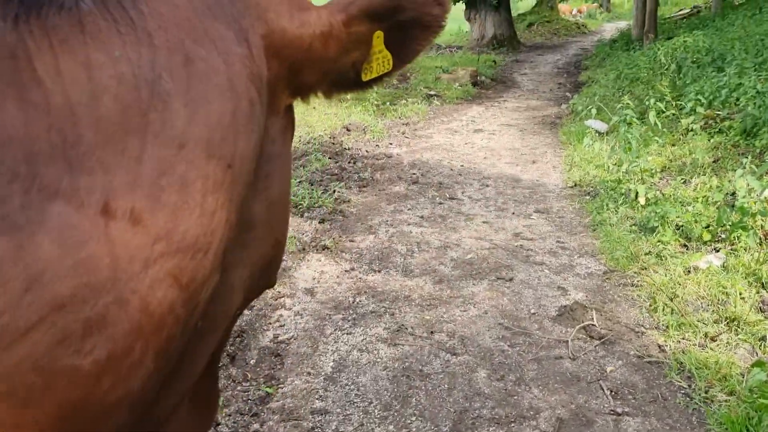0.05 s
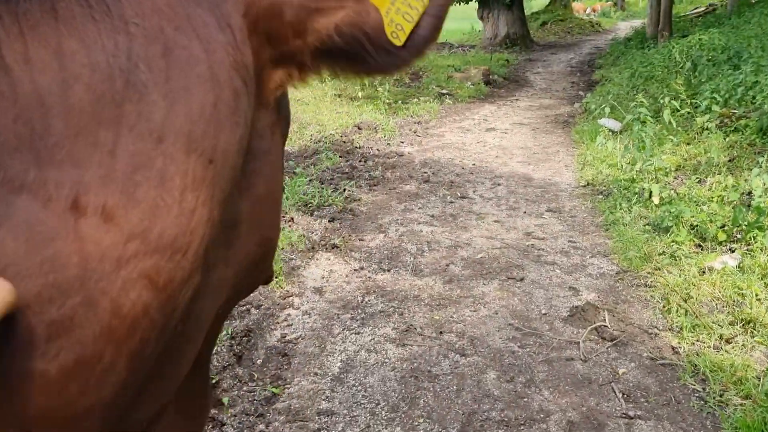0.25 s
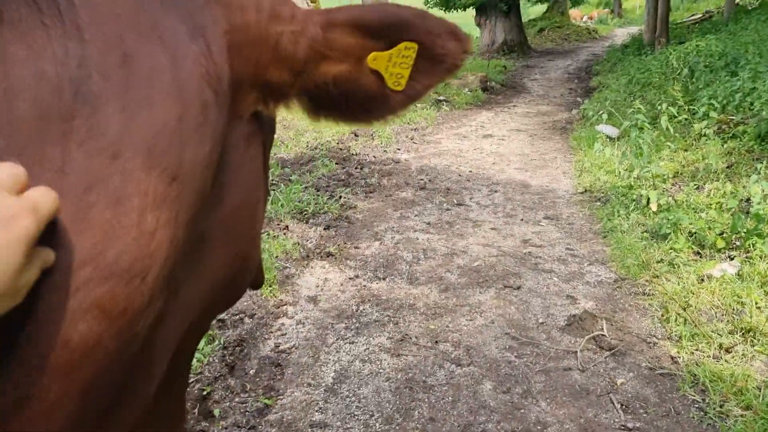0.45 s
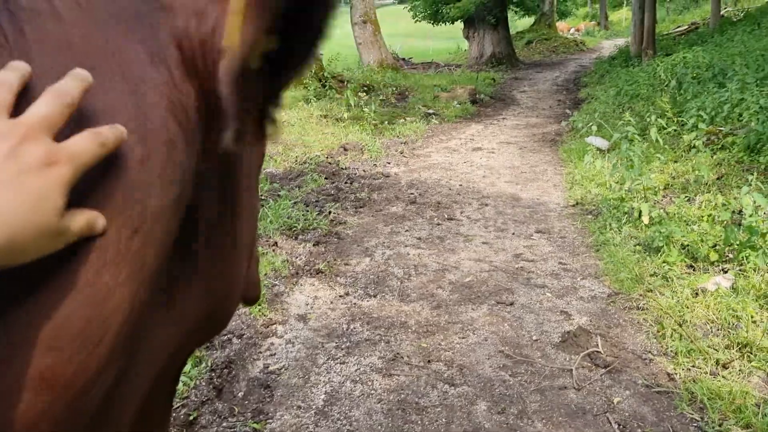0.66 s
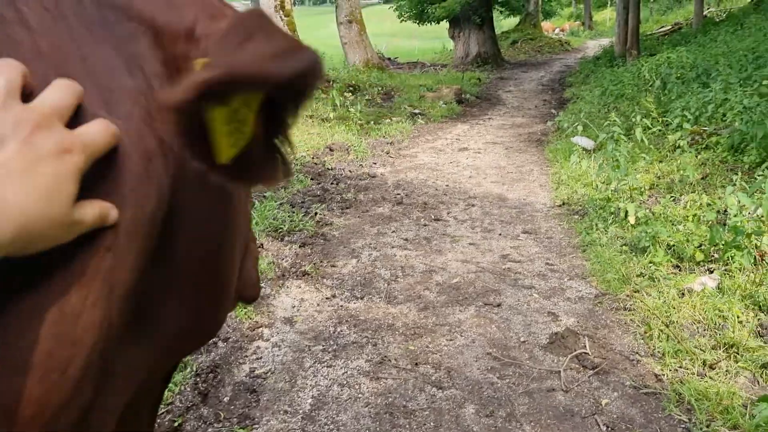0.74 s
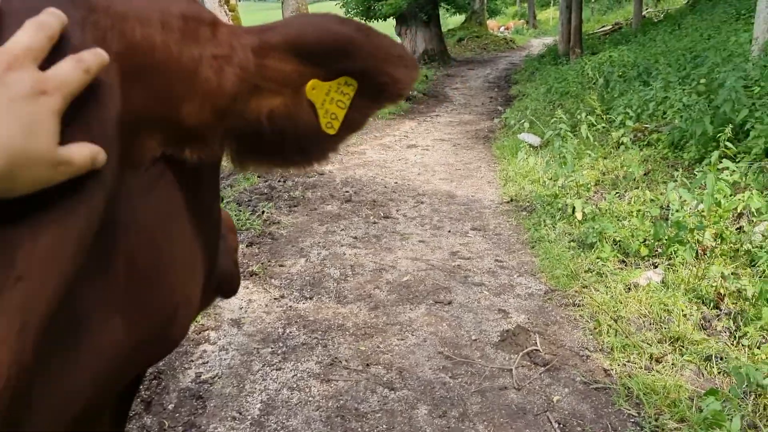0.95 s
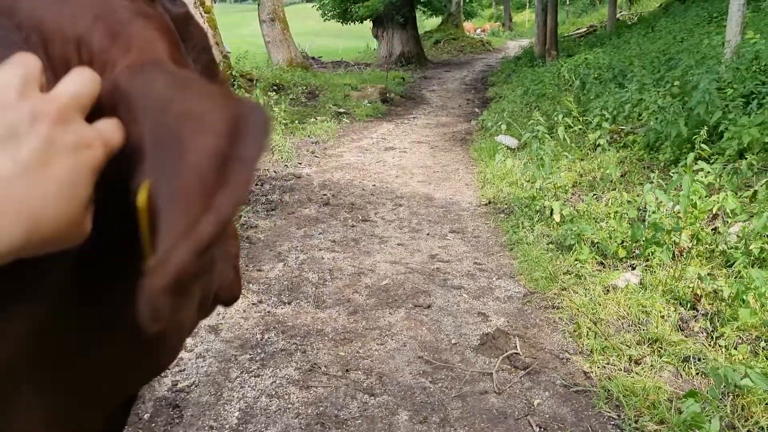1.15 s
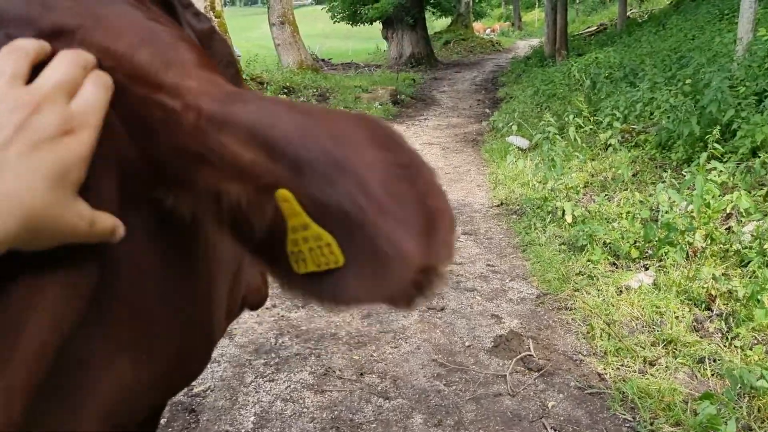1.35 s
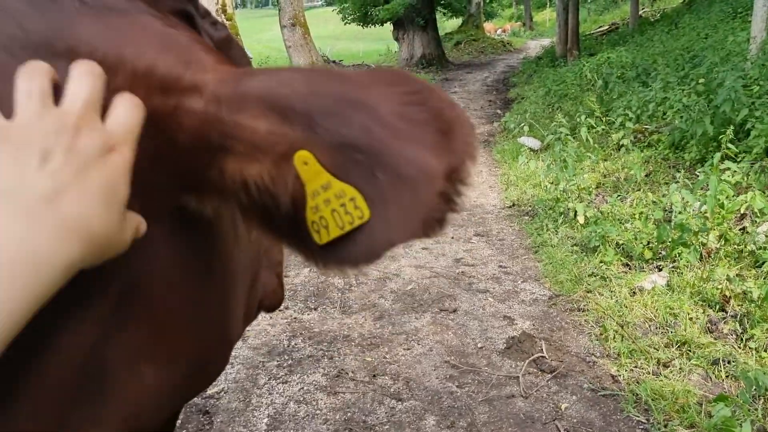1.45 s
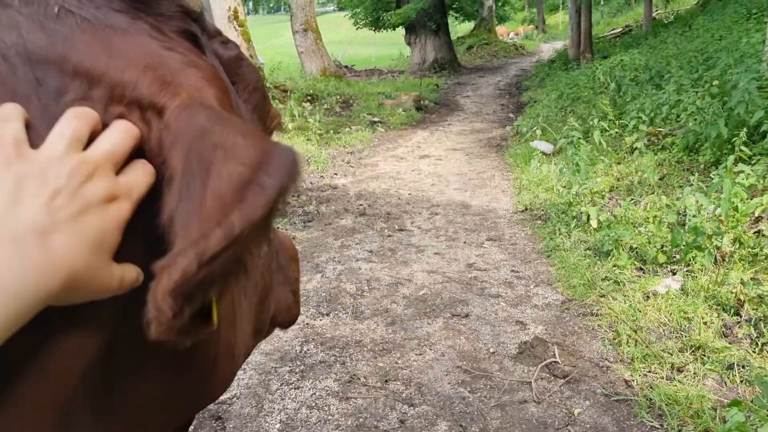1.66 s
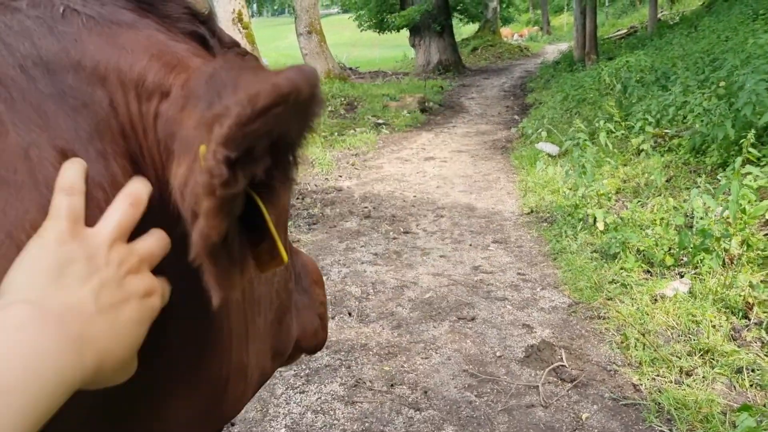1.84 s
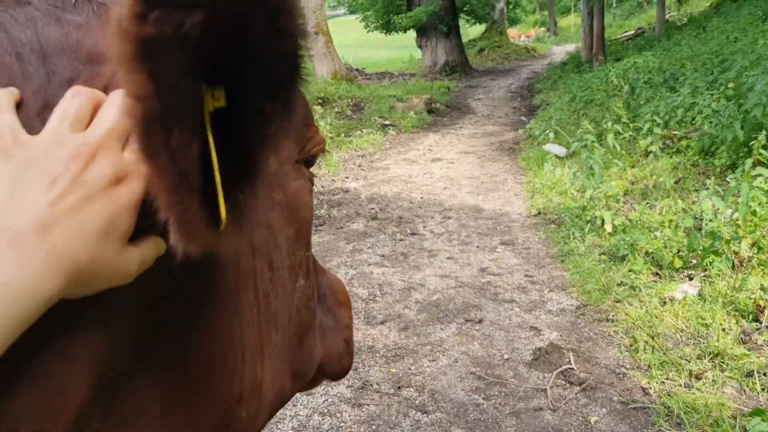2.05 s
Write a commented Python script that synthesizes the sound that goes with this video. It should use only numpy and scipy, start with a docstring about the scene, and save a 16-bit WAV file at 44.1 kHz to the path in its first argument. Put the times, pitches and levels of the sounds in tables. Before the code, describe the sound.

A cow moos once, close by, with her mouth shut. The moo starts low and pulsing, swells and climbs, then breaks into a high hum at about 0.7 seconds. It peaks near 1.3 seconds and drops into a short creak, ending by 1.8. Soft clicks come around 0.3 and 1.9 seconds. Very faint coat rubbing, thin bird whistles, forest hiss and a low hum lie underneath.

```python
"""A low, pulsing moo comes first, from a cow close by with her mouth shut. It climbs, breaks into a
pure high hum, arches over and drops into a short creak. Her vocal folds make the tone, and her
throat and nose shape it. A hand rubs her coat, something clicks softly, and small birds whistle
in the trees over a faint forest hiss and a low hum."""
import sys
import numpy as np
from scipy import signal
from scipy.fft import rfft, irfft, next_fast_len
from scipy.io import wavfile
from scipy.ndimage import map_coordinates

SR = 44100
rng = np.random.default_rng(int(sys.argv[2]) if len(sys.argv) > 2 else 0)


def inscribe(sig):
    """Save sig as 16-bit PCM at rate SR to the path in sys.argv[1].

    A 1-D sig is mono; a 2-D sig holds one channel per row.
    Samples are clipped to [-1, 1] before scaling.
    """
    pcm = np.round(np.clip(np.atleast_2d(sig).T, -1, 1) * 32767)
    wavfile.write(sys.argv[1], SR, pcm.astype(np.int16))


N = 90405

# The tune of the moo. Each row: time in seconds, pitch in Hz.
MOO_PITCH = [(0, 72.82), (0.19, 85.2), (0.34, 99.83), (0.53, 126.4), (0.6, 131.5), (0.665, 133.5),
             (0.705, 140.2), (0.722, 162.2), (0.733, 216.5), (0.78, 228.7), (0.88, 229.6), (0.915, 234.9),
             (1.025, 237.1), (1.14, 265.5), (1.18, 267.5), (1.24, 272.8), (1.29, 284.5), (1.33, 268),
             (1.39, 273.4), (1.45, 267.8), (1.48, 258.7), (1.585, 252.2), (1.66, 231.2), (1.693, 210.8),
             (1.735, 164.2), (1.756, 159.7), (1.764, 90.96), (1.785, 84.8), (1.81, 59.6)]
# How hard she calls. Each row: time in seconds, level in dB, upper overtone boost in dB, rasp in dB.
MOO_EFFORT = [(0, -19.5, 11, -66), (0.1, -9.5, 12, -53), (0.21, -5.5, 7, -48.5), (0.3, -1.5, 4.5, -63),
              (0.45, 0, 1, -67), (0.66, 0.5, 1.5, -62), (0.73, 0.5, -7.5, -63.5), (0.8, 0, -3, -56),
              (0.88, 0.5, -5, -69.5), (0.92, -0.5, 1, -65), (1.02, -0.5, 2.5, -58.5), (1.1, 0.5, -8.5, -69),
              (1.17, -0.5, -3, -67.5), (1.3, -1, 0.5, -62.5), (1.46, -0.5, -4.5, -62),
              (1.6, -0.5, -6.5, -59), (1.655, -1, 7.5, -58), (1.7, 1, -11, -53.5), (1.745, 2, -2.5, -63.5),
              (1.765, -1, -10, -63.5), (1.79, -6.5, -11.5, -75), (1.825, -32.5, -9, -90)]
# Where throat and nose ring. Each row: centre in Hz, width in Hz, level in dB.
THROAT_RESONANCES = [(150.5, 108, -30), (227.2, 106, -24), (390, 140, -33), (515.6, 80, -36),
                     (714.7, 88, -31), (954, 40, -42.5), (1084.6, 99, -33), (1263, 170, -35.5),
                     (1934, 350, -38.5), (2400, 110, -96), (2583, 154, -27.5), (3067, 190, -32.5),
                     (3586, 62, -19)]
# Bands where the moo is weaker; the highest softens the throat's top ring.
# Each row: centre in Hz, half width in Hz, depth from 0 to 1.
WEAK_BANDS = [(378, 50, .8), (635, 40, .5), (1540, 110, .8), (3560, 110, .75)]
# Moments when the folds repeat only every second beat.
# Each row: middle in seconds, half length in seconds, strength in dB.
PERIOD_DOUBLINGS = [(1.18, 0.032, -3.5), (1.25, 0.011, -3), (1.345, 0.0083, -3.5), (1.48, 0.16, -12.5)]
# Where the rasp rings. Each row: centre in Hz, width in Hz, level in dB.
RASP_RESONANCES = [(1260, 130, -3), (1900, 350, -13), (2540, 200, 1), (2990, 190, -1), (3290, 120, 2),
                   (3760, 110, 2)]
# The tone of air in the nostrils. Each row: frequency in Hz, relative level in dB.
BREATH_SPECTRUM = [(60, -20.5), (150, 15.5), (280, 22.5), (350, 11.5), (450, 20.5), (800, 2.5), (1300, 13),
                   (1550, -22.5), (1900, -1), (3000, 9.5), (4500, -21.5), (6500, -17), (7400, -6.5),
                   (8500, -14), (9700, -9), (10500, -27), (15000, -13)]
# How her voice reaches the two sides.
# Each row: frequency in Hz, left minus right in dB, how far left leads in radians.
VOICE_STEREO = [(100, 2, 0.26), (201, 0.5, 0.34), (270, 0.6, 0.51), (340, -0.5, .55), (430, 0, 0.78),
                (570, -3, 0.88), (667, -7.5, 1.19), (830, 17, 3.8), (1020, 4, 0.67), (1260, 3, 1.57),
                (1900, 0, -1.8), (2750, -4, 1.8), (2800, 6, 0.84), (3750, -6, 2.24)]
# Soft clicks. Each row: start in seconds, level in dB, centre in Hz, width in octaves,
# seconds to fade by 60 dB, left minus right in dB.
SOFT_CLICKS = [(0.3365, -45, 1050, .35, .06, -1.5), (0.342, -46, 1800, .55, .06, -1.5),
               (0.348, -39, 1900, .22, .035, -1.5), (0.349, -40, 3080, .08, .03, -1.5),
               (0.4125, -51, 1700, .25, .03, -1.5), (0.646, -52, 4500, .8, .01, 1),
               (0.6528, -53, 3500, .7, .01, 0), (0.771, -61, 3000, 1.6, .04, 0),
               (1.228, -52, 4200, .6, .025, -5), (1.248, -54, 4200, .55, .12, -3),
               (1.933, -41.5, 3100, .13, .014, -3.5)]
# Strokes of the hand. Each row: middle in seconds, half length in seconds, level in dB.
HAND_STROKES = [(0.319, 0.11, -68), (1.145, 0.023, -66), (1.321, .06, -60), (1.66, 0.048, -58.5),
                (1.817, 0.017, -59), (2.023, .025, -58)]
# The tone of rubbed hair. Each row: frequency in Hz, relative level in dB.
COAT_SPECTRUM = [(500, 3), (2000, 6.5), (5000, 1), (9000, -2.5), (11000, -8.5), (13000, 0), (15500, -14.5)]
# Bird notes. Each row: start in seconds, length in seconds, pitch in Hz, level in dB,
# left minus right in dB.
BIRD_NOTES = [(0.05, .12, 5850, -74, 0), (0.36, .04, 7720, -72, 0), (0.405, .07, 7550, -75, 0),
              (1.01, .08, 4055, -57, -8), (1.27, .1, 3955, -57, -7), (1.41, .05, 5780, -72, 0),
              (1.53, .095, 3918, -57, -4), (1.615, .05, 7750, -69, 0), (1.795, .11, 3908, -60, 1),
              (1.915, .04, 3905, -62, -2), (1.925, .11, 5720, -73, 0)]
# The tone of the forest hiss. Each row: frequency in Hz, relative level in dB.
FOREST_SPECTRUM = [(15, -28), (25, -18.5), (75, -3), (215, -16), (368, -13.5), (741, -26), (804, -29),
                   (871, -20), (1340, -25.5), (1660, -29.5), (2300, -27.5), (3340, -38), (3930, -27),
                   (4870, -35.5), (5580, -34.5), (6210, -37.5), (15500, -54.5)]
# How alike its two sides are. Each row: frequency in Hz, likeness from 0 (unrelated) to 1 (the same).
FOREST_LIKENESS = [(60, 0.36), (300, 1), (1000, 0.17), (3000, 0.033), (12000, 0.11)]
# The low hum. Each row: time in seconds, pitch in Hz, level in dB.
LOW_HUM = [(0, 68.26, -57.5), (0.6, 64.12, -55), (0.8, 65.6, -51.5), (1.3, 62.7, -51.5), (1.7, 58.3, -51.5),
           (1.84, 58.3, -47), (2.05, 54.7, -63)]


def cow():
    """The moo: voice, rasp, and breath through the nostrils that grows with the pitch."""
    pitch, = curves(MOO_PITCH)
    level_db, bright_db, rasp_db = curves(MOO_EFFORT)
    pitch = pitch * (1 + .003 * wobble(110))  # a living voice is never quite steady
    phase = 2 * np.pi * np.cumsum(pitch) / SR
    voice = vocal_folds(pitch, phase, bright_db) * amp(level_db + .35 * wobble(45))
    breath = noise(BREATH_SPECTRUM) * amp(level_db - 51.5) * (pitch / pitch.max()) ** .7
    breath *= 1 + .5 * np.cos(phase)  # the air pulses with the folds
    return filtered(voice + rasp(phase) * amp(rasp_db), voice_sides) + breath


def vocal_folds(pitch, phase, bright_db, db_per_octave=-7.5, bright_hz=574, flutter_db=1.0):
    """The beating folds make overtones, which slide through the resonances of throat and nose."""
    hz, response = resonator(THROAT_RESONANCES)
    for centre, half_width, depth in WEAK_BANDS:
        response = response * (1 - depth * np.exp(-((hz - centre) / half_width) ** 2))

    def overtone(k):
        upper_share = 1 / (1 + (bright_hz / (k * pitch)) ** 4)
        db = db_per_octave * np.log2(k) + upper_share * (bright_db + flutter_db * wobble(35))
        return amp(db) * np.real(np.interp(k * pitch, hz, response) * np.exp(1j * k * phase))

    halfway_tones = sum(overtone(k + .5) for k in range(1, 6))  # heard during period doubling
    whole_tones = sum(overtone(k) for k in range(1, 49))
    return np.sqrt(2) * (whole_tones + swells(PERIOD_DOUBLINGS) * halfway_tones)


def rasp(phase, lag_radians=2.19, puff_sharpness=.83, puff_gain=.8):
    """Once a cycle, a sharp slap of the folds and a puff of air ring the upper resonances."""
    late_phase = phase - lag_radians
    slaps = sum(np.cos(k * late_phase) for k in range(1, 57))
    puffs = rng.standard_normal(N) * np.exp(puff_sharpness * np.cos(late_phase))
    ringing = resonator(RASP_RESONANCES)
    slaps, puffs = filtered(np.array([slaps, puffs]), lambda hz: np.interp(hz, *ringing))
    return unit(unit(slaps) + puff_gain * unit(puffs))


def voice_sides(hz):
    """Each frequency of the voice reaches left and right with its own level and timing."""
    rows = np.array(VOICE_STEREO)
    side_db = along(rows[:, [0, 1]], hz)
    left_lead = along(rows[:, [0, 2]], hz)
    return pan(side_db) * np.exp(1j * np.array([[.5], [-.5]]) * left_lead)


def clicks():
    """Each click is a burst of noise in one band that dies away fast."""
    out = np.zeros((2, N))
    for start, db, centre, octaves, fade_s, side_db in SOFT_CLICKS:
        white = rng.standard_normal((3, N))
        band = filtered(white, lambda hz: 1 / (1 + (np.log2((hz + 1) / centre) / octaves) ** 2))
        burst = unit(band[2] + 1.8 * band[:2])  # one shared noise, plus one for each side
        age = clock() - start
        out += pan(side_db) * burst * (age >= 0) * amp(db - 60 * np.abs(age) / fade_s)
    return out


def hand(grain_db=.67):
    """Hairs brush under the palm in soft, slightly grainy swells."""
    return noise(COAT_SPECTRUM) * swells(HAND_STROKES) * amp(grain_db * wobble(290))


def birds(sag=.004, waver=.0015):
    """Thin, slightly falling whistles that echo in the trees."""
    out = np.zeros((2, N))
    for start, length, hz, db, side_db in BIRD_NOTES:
        progress = np.clip((clock() - start) / length, 0, 1)
        pitch = hz * (1 + sag * (1 - 2 * progress) + waver * (hz / 4000) ** 2 * wobble(300))
        swell = np.sqrt(2 * np.abs(np.sin(np.pi * progress)))
        out += pan(side_db) * amp(db) * swell * np.sin(2 * np.pi * np.cumsum(pitch) / SR)
    return out + tree_echo(out, level_db=-2, fade_s=1.3)


def tree_echo(x, level_db, fade_s):
    """Trunks scatter the sound into a tail that falls 60 dB in fade_s seconds."""
    tail = rng.standard_normal((2, SR)) * amp(-60 * clock()[:SR] / fade_s)
    return amp(level_db) * signal.fftconvolve(x, tail / np.linalg.norm(tail[0]), axes=1)[:, :N]


def forest_hiss(level_db=-53.5):
    """A faint hiss, partly the same on both sides."""
    def spread(hz):
        return np.arccos(np.clip(along(FOREST_LIKENESS, hz), -1, 1)) / 2

    middle, side = noise(FOREST_SPECTRUM)
    middle = filtered(middle, lambda hz: np.cos(spread(hz)))
    side = filtered(side, lambda hz: np.sin(spread(hz)))
    return amp(level_db) * np.array([middle + side, middle - side])


def low_hum(octave_db=-15.5):
    """A low, wavering tone with a weaker one an octave above."""
    hz, db = curves(LOW_HUM)
    phase = 2 * np.pi * np.cumsum(hz * (1 + .042 * wobble(25))) / SR
    tone = np.sin(phase) + amp(octave_db) * np.sin(2 * phase)
    return np.sqrt(2) * amp(db + 2.3 * wobble(14.3)) * tone


def amp(db):
    """Turn decibels into a gain."""
    return 10 ** (np.asarray(db) / 20)


def unit(x):
    """Scale a sound to an average power of 1."""
    return x / np.sqrt(np.mean(x ** 2) + 1e-20)


def clock():
    """The time of every sample, in seconds."""
    return np.arange(N) / SR


def along(points, hz):
    """Read between (Hz, value) points, with octaves evenly spaced."""
    point_hz, values = np.transpose(points)
    return np.interp(np.log(hz + 1), np.log(point_hz + 1), values)


def curves(rows):
    """One value per sample for each column after the time."""
    times, *columns = np.transpose(rows)
    return [np.interp(clock(), times, column) for column in columns]


def swells(rows):
    """Add up smooth bumps, one for each row."""
    return sum(amp(db) * np.exp(-((clock() - middle) / half) ** 2) for middle, half, db in rows)


def wobble(rate):
    """A smooth curve through `rate` random points a second."""
    return map_coordinates(rng.standard_normal(4096), [clock() * rate + 1])


def filtered(x, response):
    """Change the level and timing of each frequency in x by response(hz)."""
    size = next_fast_len(N + SR // 2)
    return irfft(rfft(x, size) * response(np.fft.rfftfreq(size, 1 / SR)), size)[..., :N]


def resonator(resonances, size=16384):
    """Frequencies and response of a filter with steep ringing peaks."""
    hz = np.fft.rfftfreq(size, 1 / SR) + 1
    peaks = [amp(db) / (1 + ((hz * hz - centre * centre) / (hz * width)) ** 2)
             for centre, width, db in resonances]
    gain = np.sqrt(sum(peak ** 2 for peak in peaks))
    # These steps make it ring only after a push, never before.
    cepstrum = irfft(np.log(gain + 1e-6))
    cepstrum[1:size // 2] *= 2
    cepstrum[size // 2 + 1:] = 0
    return hz, np.exp(rfft(cepstrum))


def noise(spectrum):
    """Two unrelated noises with the given tone and a power of 1."""
    return unit(filtered(rng.standard_normal((2, N)), lambda hz: amp(along(spectrum, hz))))


def pan(db):
    """Left and right gains, with left louder by db."""
    return amp(np.array([[.5], [-.5]]) * db)


def scene():
    """The close cow, barely echoed, and the forest behind her."""
    near = cow() + clicks() + hand()
    return near + tree_echo(near, level_db=-31, fade_s=.35) + birds() + forest_hiss() + low_hum()


def record(dry, top_hz=15750):
    """Cut away the very highest treble."""
    return filtered(dry, lambda hz: hz < top_hz)


dry = scene()
out = record(dry)
inscribe(out)
```